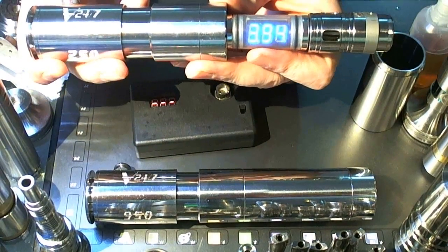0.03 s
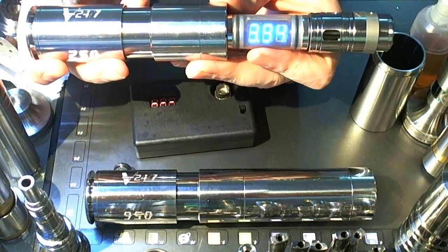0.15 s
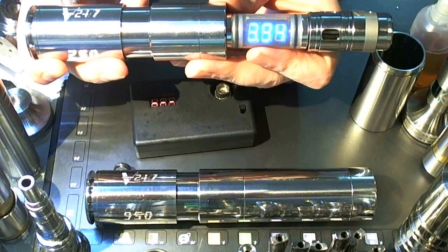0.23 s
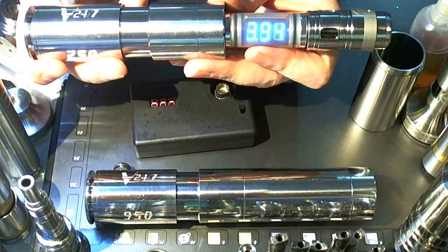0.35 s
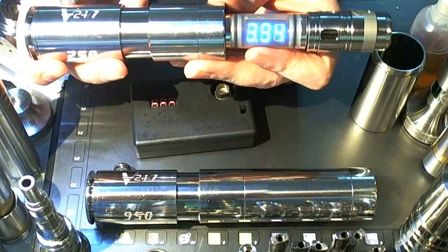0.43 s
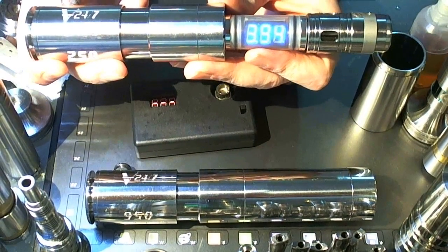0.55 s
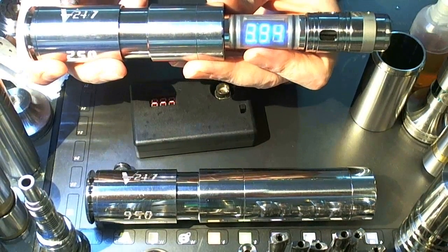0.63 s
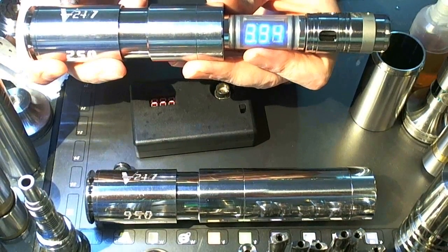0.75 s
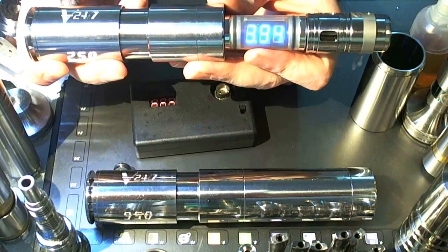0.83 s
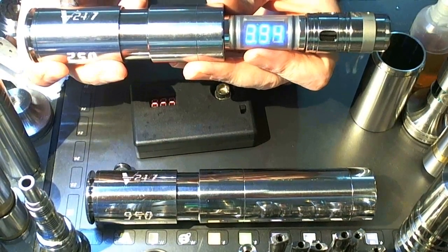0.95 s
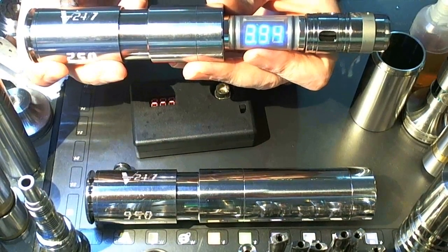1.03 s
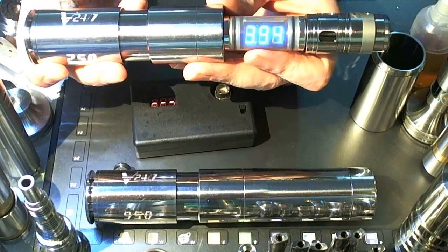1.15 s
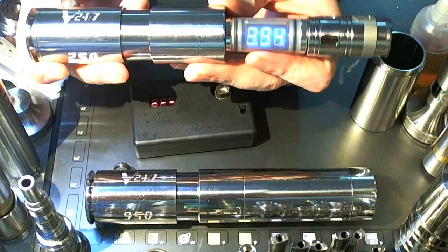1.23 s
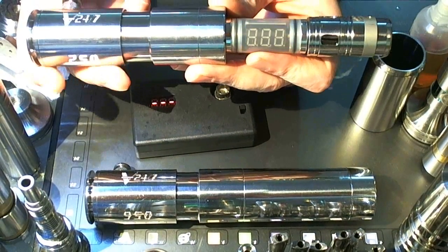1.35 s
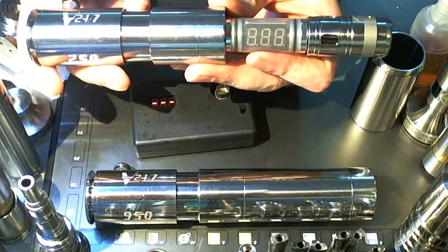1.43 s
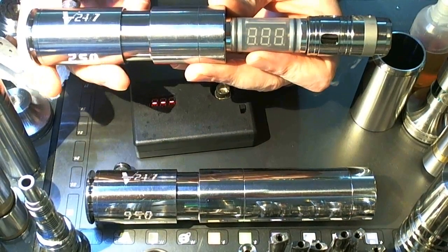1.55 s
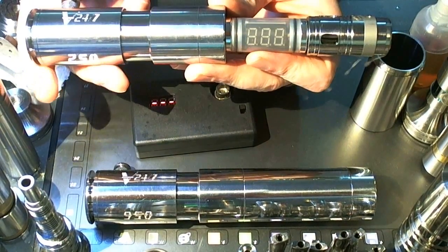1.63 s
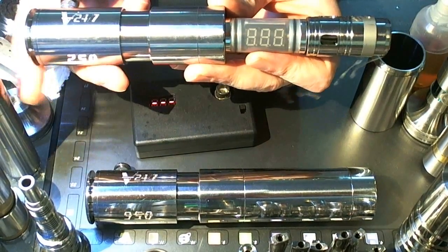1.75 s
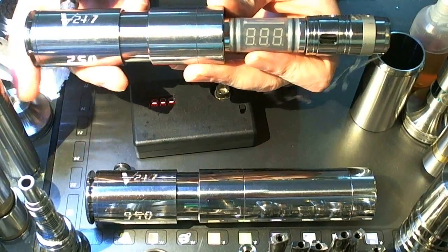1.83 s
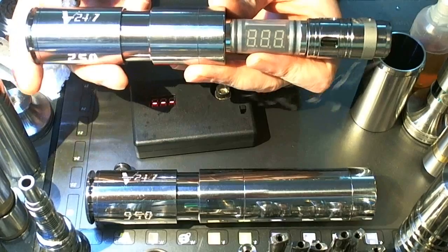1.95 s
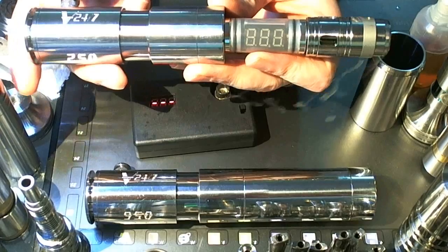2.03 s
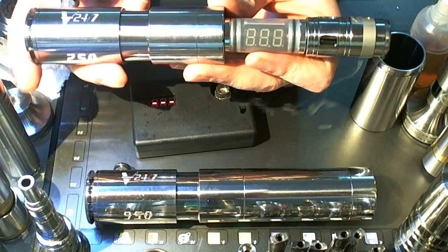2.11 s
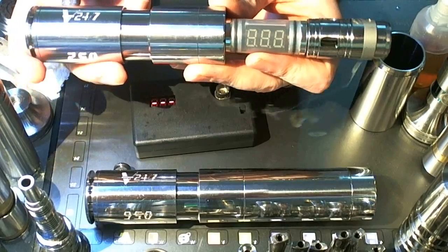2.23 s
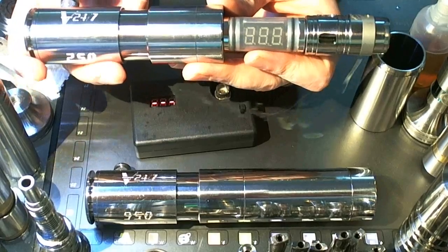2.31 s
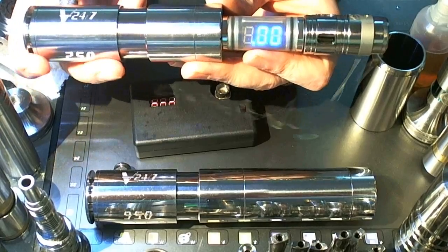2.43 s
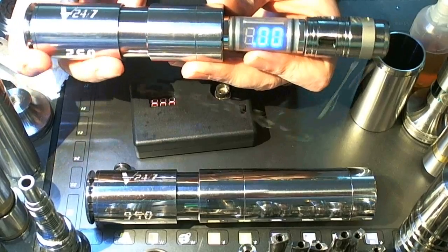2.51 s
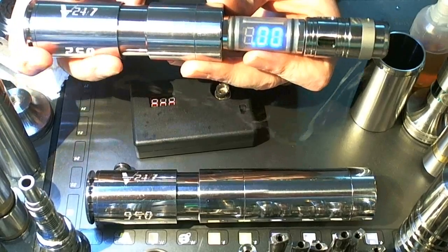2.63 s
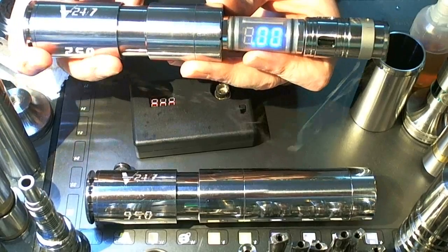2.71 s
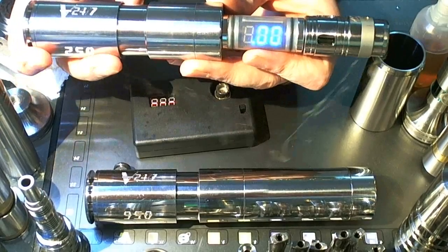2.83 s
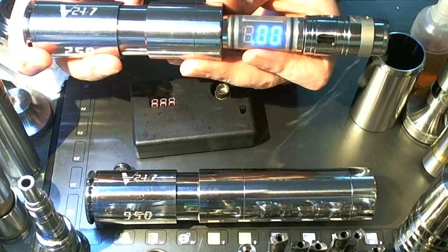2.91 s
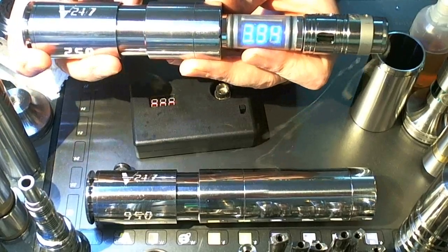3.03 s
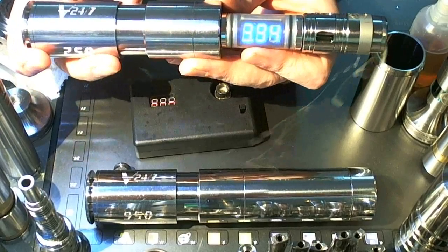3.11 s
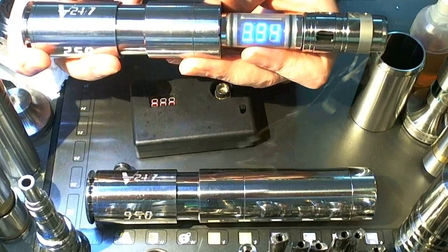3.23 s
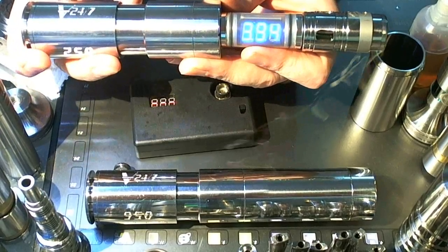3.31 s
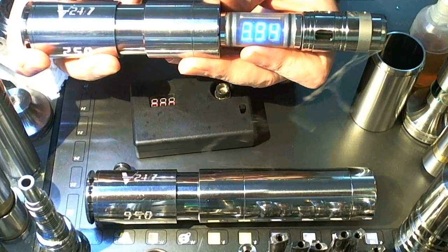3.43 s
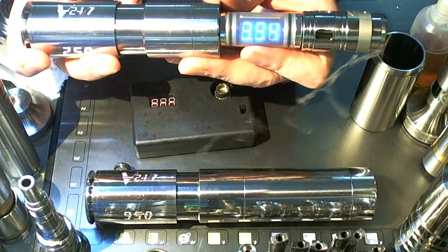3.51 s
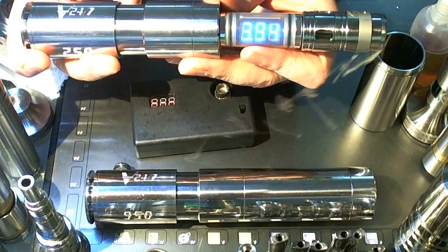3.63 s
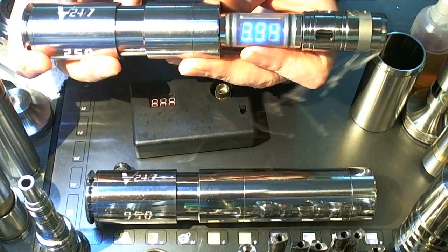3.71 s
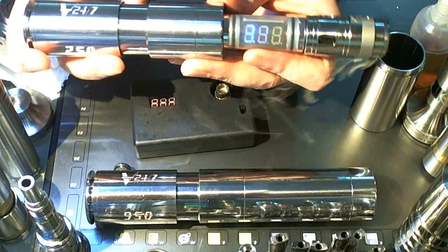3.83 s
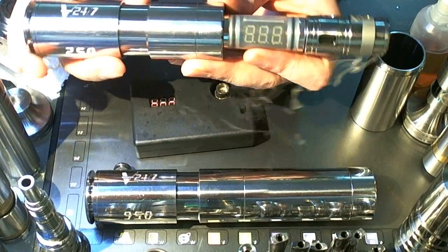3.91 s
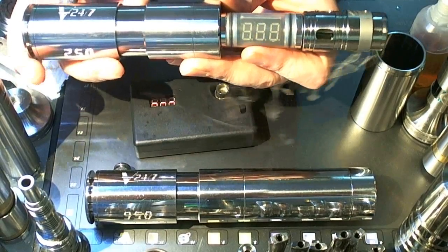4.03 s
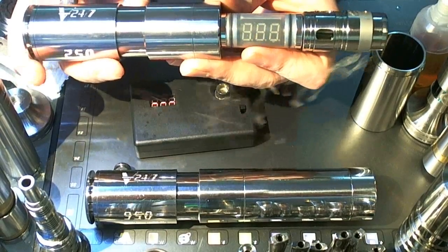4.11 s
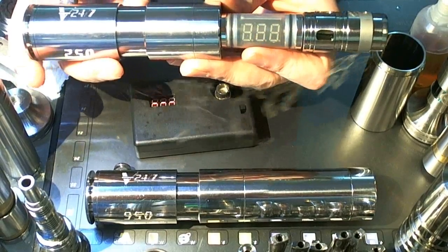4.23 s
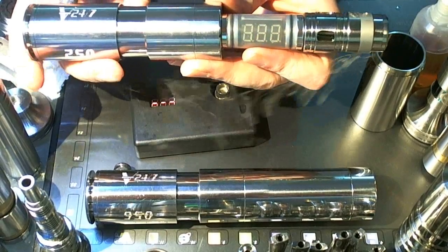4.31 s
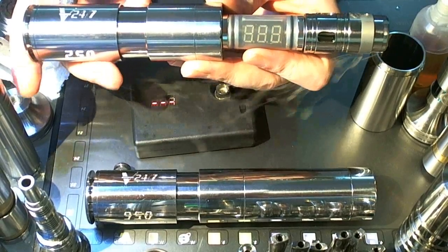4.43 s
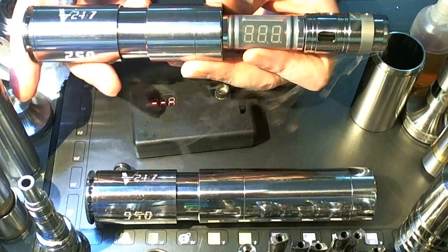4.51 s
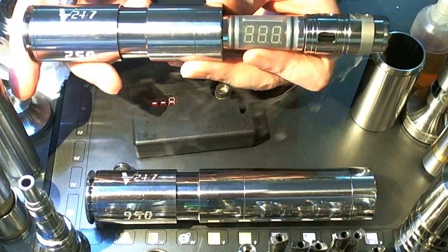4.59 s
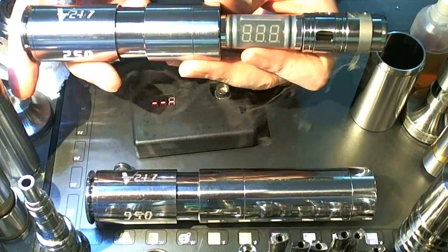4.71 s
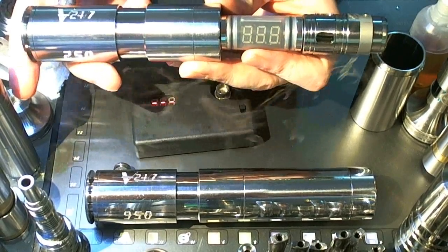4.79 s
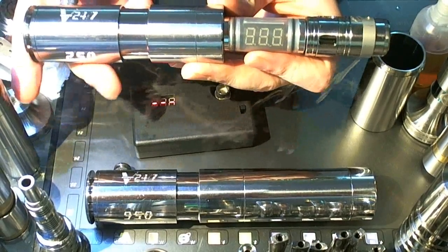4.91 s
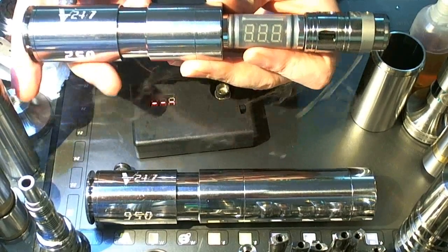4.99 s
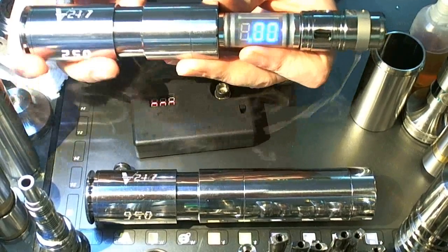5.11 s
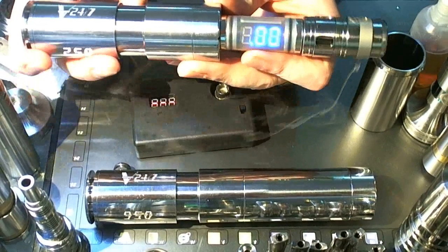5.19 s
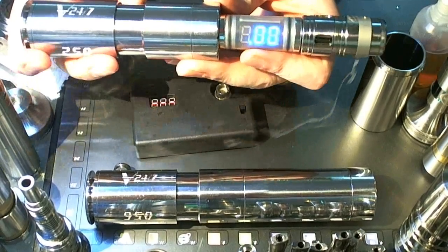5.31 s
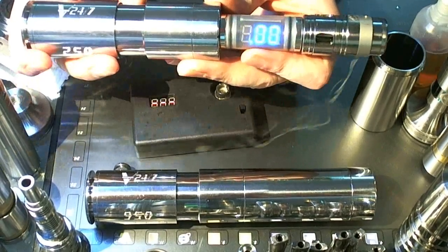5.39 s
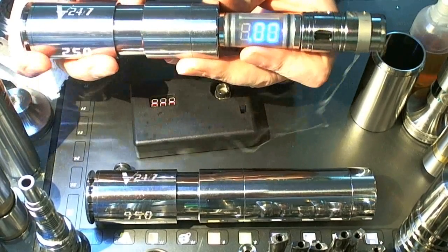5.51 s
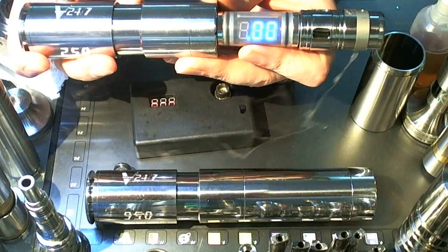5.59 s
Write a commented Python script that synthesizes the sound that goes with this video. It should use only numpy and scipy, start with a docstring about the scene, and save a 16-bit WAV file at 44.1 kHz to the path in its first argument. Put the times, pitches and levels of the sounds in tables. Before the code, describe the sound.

Close to a small microphone, a hot vaporizer coil crackles and sizzles, with droplets bursting in bright, slightly metallic pops. It cools to a few scattered pops, starts again with a loud crack and thin ticks, then fades with two soft knocks. A brief third burst of sizzling comes at the end. Steady room noise, a faint hum and a low drone fill the otherwise quiet room.

```python
"""A dense sizzle with single loud pops: a vaporizer, fired three times just above a desk in a quiet room.
Droplets and tiny bubbles burst on the hot coil and ring the short steel chamber; thin ticks lie on top.
The sizzle dies away as the coil cools. The desk echoes each pop, and the loudest overload the small,
close microphone. Two soft knocks sound; a faint hum, a low drone and room noise go on throughout."""
import sys
import numpy as np
from scipy import signal
from scipy.fft import rfft, irfft
from scipy.io import wavfile

SR = 44100
rng = np.random.default_rng(int(sys.argv[2]) if len(sys.argv) > 2 else 0)


def digitize_waveform(pressure):
    """Quantize a signal to 16-bit integers and store it at the path in sys.argv[1].

    Rows of a 2-D input are taken as channels; values are limited to [-1, 1].
    """
    field = np.atleast_2d(pressure).T
    bounded = np.clip(field, -1, 1)
    quanta = np.round(bounded * 32767).astype(np.int16)
    wavfile.write(sys.argv[1], SR, quanta)


N = 249341
TIME = np.arange(N) / SR
POP_LENGTH_S = .004  # burst levels are rms over this span


def undb(db):
    """Decibels to gain."""
    return 10 ** (np.asarray(db) / 20)


def unit(x):
    """Scale to rms 1."""
    return x / np.sqrt(np.mean(x ** 2))


def impulses(times, sizes):
    """One spike per time."""
    return np.bincount(np.clip(np.round(times * SR).astype(int), 0, N - 1), sizes, N)


def scattered(count):
    """Random times, one in each of count equal steps."""
    return (np.arange(count) + rng.uniform(0, 1, count)) * N / SR / count


def ring(x, hz, width_hz):
    """Damped resonance, gain 1 at its centre."""
    return signal.lfilter(*signal.iirpeak(hz, hz / width_hz, SR), x + 1e-18)


def cut(x, hz, kind, order):
    """Butterworth low-pass or high-pass."""
    return signal.sosfilt(signal.butter(order, hz, kind, fs=SR, output="sos"), x + 1e-18)


def drift(rate_hz):
    """Slow random curve, spread near 1."""
    return np.interp(TIME * rate_hz, np.arange(1024), rng.standard_normal(1024))


def wavering_tone(hz, rms_db, waver_hz=1.2, flutter_db=3.0):
    """Sine with drifting pitch and level."""
    phase = 2 * np.pi * np.cumsum(hz + waver_hz * drift(8.7)) / SR
    return np.sqrt(2) * undb(rms_db + flutter_db * drift(4.1)) * np.sin(phase)


# Room noise spectrum: (frequency [Hz], relative density [dB])
NOISE_SPECTRUM = [(20, -8.5), (70, -9.5), (130, -8), (300, -1.5), (600, -0.5), (1200, 0.5), (2000, -2.5),
                  (2700, -6.5), (3300, -8), (3950, -10.5), (4700, -8), (6000, -11)]


def room_noise(rms_db=-42.5, flutter_db=0.78):
    """Even, broad noise with a slight flutter."""
    hz, db = np.array(NOISE_SPECTRUM, float).T
    colour = undb(np.interp(np.log(np.fft.rfftfreq(N, 1 / SR) + 1), np.log(hz), db))
    noise = unit(irfft(rfft(rng.standard_normal(N)) * colour, N))
    return noise * undb(rms_db + flutter_db * drift(6))


# Hum lines: (frequency [Hz], rms level [dB])
HUM_LINES = [(306, -70), (381.5, -59.5), (610, -64.5), (1221, -71), (1395, -67.5)]


def hum():
    """Faint, continuous tones."""
    return sum(wavering_tone(hz, db) for hz, db in HUM_LINES)


# Drone swells: (start [s], end [s], level [dB])
SWELLS = [(0, 0.427, -58.5), (0.837, 1.33, -56), (1.506, 1.87, -60.5), (1.95, 3.15, -70)]
# Drone partials: (harmonic number, relative level [dB])
DRONE_PARTIALS = [(2, -12), (3, -1), (5, -12)]


def drone(fundamental_hz=62.4, fade_s=0.043, rest_db=-74):
    """Low harmonics that swell, hold and fade back."""
    swells = sum(undb(db) * np.clip(np.minimum(TIME - start, end - TIME) / fade_s + .5, 0, 1)
                 for start, end, db in SWELLS)
    level_db = 20 * np.log10(undb(rest_db) + swells)
    return sum(wavering_tone(k * fundamental_hz, level_db + db) for k, db in DRONE_PARTIALS)


def room(x, echo_s=0.001892, echo_db=-15.5, wet_db=-12, t60_s=0.43, predelay_s=0.0041):
    """The desk returns one quick echo; things on it and the walls add a short diffuse tail."""
    desk = np.interp(TIME - echo_s, TIME, x, left=0)
    t = TIME[:SR // 2]
    tail = rng.standard_normal(len(t)) * np.exp(-np.log(1000) * t / t60_s) * (t > predelay_s)
    tail /= np.sqrt(np.sum(tail ** 2))
    return x + undb(echo_db) * desk + undb(wet_db) * signal.fftconvolve(x, tail)[:N]


# Soft knocks: (time [s], level [dB], frequency [Hz], bandwidth [Hz])
SOFT_KNOCKS = [(4, -35, 780, 340), (4.377, -47, 5100, 700)]


def knocks():
    """Taps, each one quickly damped resonance."""
    taps = sum(undb(db) * unit(ring(impulses(np.array([time_s]), [1.]), hz, width_hz))
               for time_s, db, hz, width_hz in SOFT_KNOCKS)
    return taps * np.sqrt(POP_LENGTH_S * SR / N)


# Sharpest ticks: (time [s], relative level [dB])
SHARP_TICKS = [(2.831, -37), (2.8807, -38), (3.0041, -42), (3.1772, -39), (3.237, -39), (3.2773, -22),
               (3.3258, -41), (3.3752, -39), (3.474, -38), (3.499, -38), (3.6476, -42), (3.737, -37.5),
               (3.7474, -33), (4.2376, -35), (5.631, -27.5)]


def ticks(gain_db=6, highpass_hz=6000, spread_db=4.5, stray_db=-2, fizz_db=-21):
    """Thin treble spikes: a few sharp ones, plus stray ones and a fine fizz that follow the boiling."""
    sharp_times, sharp_db = np.array(SHARP_TICKS, float).T
    spikes = impulses(sharp_times, undb(sharp_db))
    for times, share_db in ((scattered(80), stray_db), (scattered(1200), fizz_db)):
        *_, tick_db = boiling(times)
        spikes += impulses(times, undb(tick_db + share_db + spread_db * rng.standard_normal(len(times))))
    return cut(undb(gain_db) * spikes, highpass_hz, "high", order=2)


# Chamber and mouthpiece modes: (frequency [Hz], bandwidth [Hz], relative level [dB])
CHAMBER_MODES = [(740, 310, -24), (1800, 306, -17.5), (2728, 450, -7.5), (3205, 184, 1), (3429, 263, -1.5),
                 (4384, 91, -12.5), (4742, 450, -8.5), (4870, 940, -12.5), (6220, 140, -22.5),
                 (7200, 170, -31)]


def chamber(times, db, low_db, high_db, scatter_db, low_hz=2800, main_hz=3290, high_hz=3600):
    """Each burst kicks all modes; its place on the coil sets the share of the low and high ones."""
    hz, width_hz, mode_db = np.array(CHAMBER_MODES, float).T
    lowness = np.interp(hz, [low_hz, main_hz], [1, 0])
    highness = np.interp(hz, [main_hz, high_hz], [0, 1])
    random_db = scatter_db * rng.standard_normal((len(times), len(hz)))
    kicks = undb(mode_db + np.outer(low_db, lowness) + np.outer(high_db, highness) + random_db)
    # energy independent of colour
    sizes = undb(db) * SR * np.sqrt(POP_LENGTH_S / (np.pi * (kicks ** 2 @ width_hz)))
    # neighbouring tube modes reach the mouth with opposite sign
    return sum((-1) ** k * ring(impulses(times, sizes * kicks[:, k]), hz[k], width_hz[k])
               for k in range(len(hz)))


def lull_db(times, depth_db=-2, lead_s=0.017):
    """The sizzle thins just before each loud pop."""
    wait_s = np.array(DROPLET_BURSTS, float)[:, :1] - times
    return depth_db * np.max((wait_s > 0) * np.exp(-np.abs(wait_s) / lead_s), axis=0)


# Three firings, two faint simmers: (start [s], end [s], level [dB], swell [dB/s],
# initial low modes [dB], initial high modes [dB], ticks [dB])
BOIL_SPELLS = [(-0.2, 1.382, -30, 3, -4.5, -2.5, -83.5), (2.58, 3.1, -50.5, 31, -3, -3, -62),
               (2.76, 4.047, -29.5, 2.1, 2.5, 4, -42.5), (4.665, 4.756, -45, -15, -1, 2, -53.5),
               (5.45, 5.70, -32, 3, -2.5, -1, -44)]


def boiling(times, heat_up_s=0.021, cool_db_per_s=55, tick_cool_db_per_s=20, broaden_db_per_db=1.05):
    """Liquid comes to the boil, broadens as it swells, then cools: (level, low, high, ticks) in dB."""
    start, end, db, swell_db_per_s, low_db, high_db, tick_db = np.array(BOIL_SPELLS, float).T[:, :, None]
    age_s, cooling_s = np.maximum(times - start, 0), np.maximum(times - end, 0)
    heat_db = 20 * np.log10(1 - np.exp(-age_s / heat_up_s) + 1e-9)
    swell_db = swell_db_per_s * np.minimum(age_s, end - start)
    level_db = db + heat_db + swell_db - cool_db_per_s * cooling_s
    strongest = np.argmax(level_db, axis=0), np.arange(len(times))
    broad_db = broaden_db_per_db * swell_db
    return (level_db[strongest] + lull_db(times),
            (low_db + broad_db)[strongest],
            (high_db + broad_db)[strongest],
            np.max(tick_db + heat_db - tick_cool_db_per_s * cooling_s, axis=0))


def sizzle(count=4200, spread_db=5.0, largest_db=9, gain_db=1.5):
    """Hundreds of tiny bubbles a second, as strong as the boiling."""
    times = np.sort(rng.uniform(0, N / SR, count))
    size_db = np.minimum(spread_db * rng.standard_normal(count), largest_db)
    overlap_db = 10 * np.log10(POP_LENGTH_S * np.sum(undb(size_db) ** 2) * SR / N)
    boil_db, low_db, high_db, _ = boiling(times)
    return chamber(times, boil_db + size_db - overlap_db + gain_db, low_db, high_db, scatter_db=1.5)


def crackle(count=125, over_boil_db=6.5, spread_db=2.1, breadth_db=-2, breadth_spread_db=4):
    """Small droplets, about twenty a second, burst a little above the sizzle."""
    times = scattered(count)
    boil_db, low_db, high_db, _ = boiling(times)
    size, colour = rng.standard_normal((count, 2)).T
    level_db = boil_db + over_boil_db + spread_db * size
    broad_db = breadth_db + breadth_spread_db * colour
    return chamber(times, level_db, low_db + broad_db, high_db + broad_db, scatter_db=-1.5)


def thumps(gain_db=3, threshold_db=-7, lowpass_hz=800, highpass_hz=160):
    """The loudest pops carry a short low thump as they overload the microphone."""
    times, db, _, _ = np.array(DROPLET_BURSTS, float).T
    thump_spikes = impulses(times, undb(db + gain_db) * np.clip(db - threshold_db, 0, 1))
    return cut(cut(thump_spikes, lowpass_hz, "low", order=2), highpass_hz, "high", order=1)


# Loudest droplets on the coil: (time [s], level [dB], low modes [dB], high modes [dB])
DROPLET_BURSTS = [(0.1043, -13, -8.5, -4), (0.128, -18.5, -4.5, -19), (0.1781, -21, -3, -6.5),
                  (0.2726, -16, -22.5, -3), (0.4048, -20.5, -9.5, -9), (0.5349, -12.5, -3, 3),
                  (0.5551, -18.5, -5, -6), (0.6526, -14, -5, 3.5), (0.6545, -11.5, -5.5, -5),
                  (0.7589, -12.5, -13, -10.5), (0.818, -15.5, -2, 1.5), (0.8412, -18.5, -5.5, -8.5),
                  (0.8755, -12.5, 3, 3), (0.9724, -13, 0, 5.5), (0.9808, -16, -3.5, -6.5),
                  (1.0241, -13.5, -7.5, -4), (1.055, -13.5, -6, -8.5), (1.0884, -11.5, 0, -3),
                  (1.102, -14.5, 3, 4.5), (1.1408, -11, -3.5, -7.5), (1.2645, -18, -5, -15.5),
                  (1.29, -18, -0.5, 1), (1.304, -15.5, -4.5, -11.5), (1.338, -14, -7, -6.5),
                  (1.3582, -11, -7, -7), (1.4632, -15.5, -5, 1.5), (1.4798, -19, -11, 0),
                  (1.5219, -23, 0.5, -7), (1.542, -10, -4, 3.5), (1.5569, -21.5, 0, -7),
                  (1.5758, -24, 2, 12), (1.7464, -20.5, -3, -5), (1.7525, -22.5, -5, -3),
                  (1.781, -25, -3, -7), (1.819, -33.5, 1, -2), (2.0472, -32.5, 1, -3),
                  (2.23, -33.5, -9, -8), (2.664, -34, 5, 4), (2.7528, -4.5, 2, 2.5), (2.818, -21.5, 3, 3),
                  (2.833, -17.5, 2.5, 2.5), (2.8525, -16, -8, -4), (2.9365, -5, 1.5, 1),
                  (2.9572, -24, 0, 16), (3.0007, -7.5, -5, -3.5), (3.0123, -16, -4, 1.5),
                  (3.0864, -12.5, 3.5, -2.5), (3.1235, -16.5, -1.5, -0.5), (3.1416, -20, 7.5, 1),
                  (3.1953, -15.5, 3, 3.5), (3.2285, -15.5, 1.5, -2.5), (3.2359, -16, 2.5, 3),
                  (3.2763, -13.5, -2, -11), (3.376, -17.5, 19, 14), (3.3994, -14.5, 1, -4),
                  (3.449, -18, 4, -2), (3.4773, -16, 5.5, 3), (3.5835, -16, 14.5, 15.5),
                  (3.6161, -19, 1, 6), (3.637, -19, 4, 7), (3.7858, -15.5, -0.5, 0), (3.876, -19.5, 3, 0),
                  (4.022, -24, 21.5, 0.5), (4.0386, -17.5, 1, 3.5), (4.144, -24, -3, -5),
                  (4.168, -25, 3, 8), (4.2051, -25, 10, 6), (4.228, -31, 8, 4), (4.3594, -28.5, 13, -6),
                  (4.552, -27.5, 5.5, 4), (5.2944, -35, 4.5, 6), (5.396, -14.5, -0.5, -4),
                  (5.4471, -19.5, -2, -0.5), (5.4874, -17.5, -15, -5), (5.5498, -23, 2, 3),
                  (5.6211, -16.5, -3, -3)]


def pops(gain_db=1, spatter_db=-16, max_delay_s=0.0039, crack_above_db=-12, crack_db_per_db=0.6):
    """A droplet bursts, and a fleck of it bursts again a moment later."""
    times, db, low_db, high_db = np.array(DROPLET_BURSTS, float).T
    delay_s = max_delay_s * rng.uniform(.2, 1, len(times))
    # violent bursts drive the broad, short-lived modes harder
    crack_db = crack_db_per_db * np.maximum(db - crack_above_db, 0)
    bursts = chamber(times, db + gain_db, low_db + crack_db, high_db + crack_db, scatter_db=2.0)
    spatter = chamber(times + delay_s, db + spatter_db, low_db, high_db, scatter_db=-4)
    return bursts + spatter


def scene():
    """The crackling coil in its room, mono."""
    close_sounds = pops() + thumps() + crackle() + sizzle() + knocks()
    return (room(close_sounds) + room_noise() + hum() + drone())[None]


def record(dry, mic_top_hz=6350, clip_level=.96, hiss_db=-92, top_hz=16000):
    """Narrow-band microphone, overloaded by the loudest pops; ticks and hiss reach above its band."""
    narrow = cut(dry, mic_top_hz, "low", order=14)
    clipped = np.clip(narrow, -clip_level, clip_level)
    mix = clipped + ticks() + undb(hiss_db) * rng.standard_normal(N)
    return signal.sosfilt(signal.ellip(8, .2, 70, top_hz, fs=SR, output="sos"), mix)


dry = scene()
out = record(dry)
digitize_waveform(out)
```